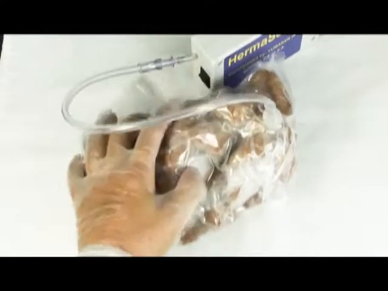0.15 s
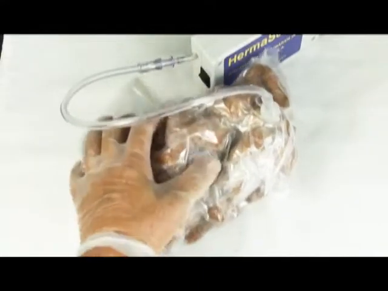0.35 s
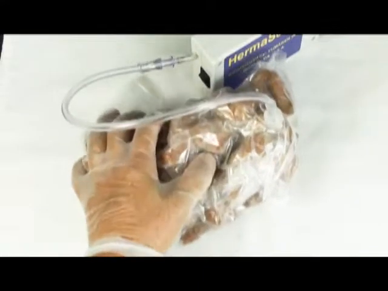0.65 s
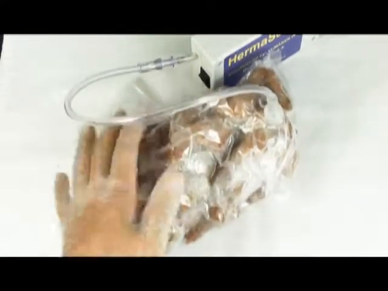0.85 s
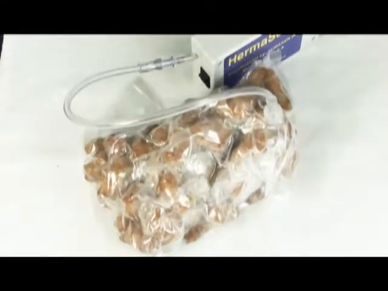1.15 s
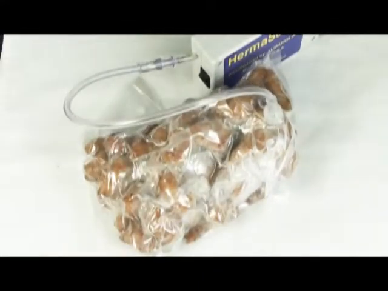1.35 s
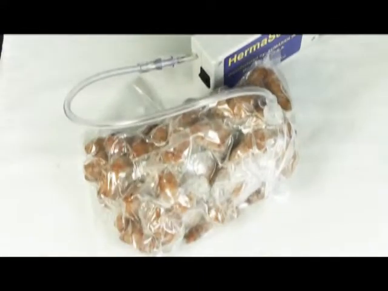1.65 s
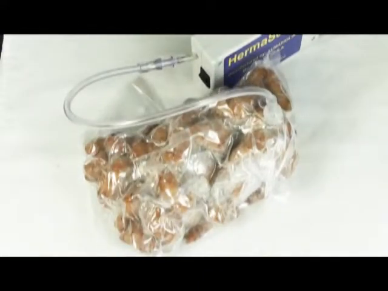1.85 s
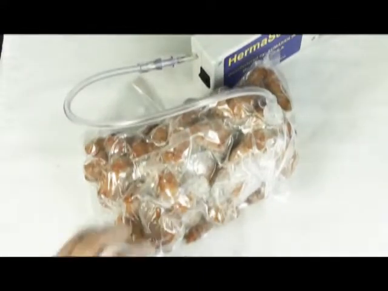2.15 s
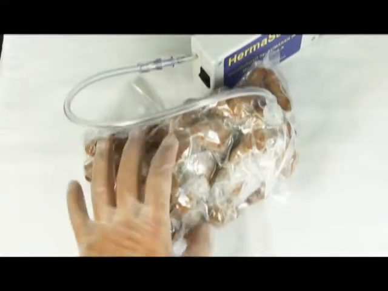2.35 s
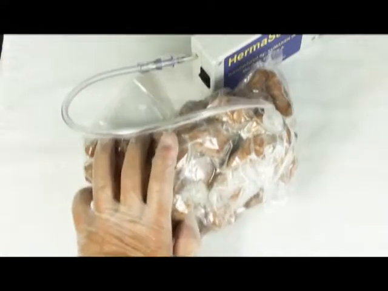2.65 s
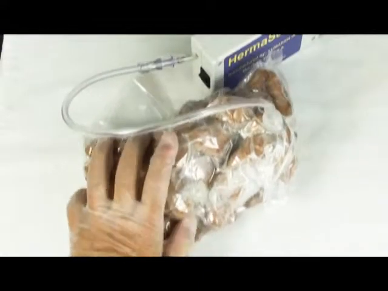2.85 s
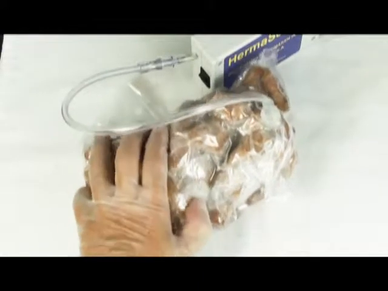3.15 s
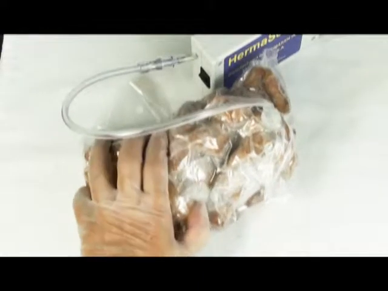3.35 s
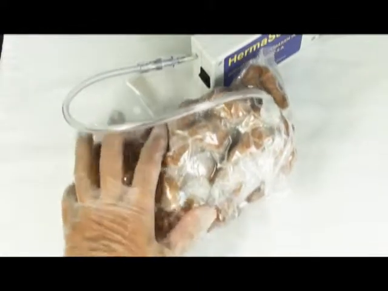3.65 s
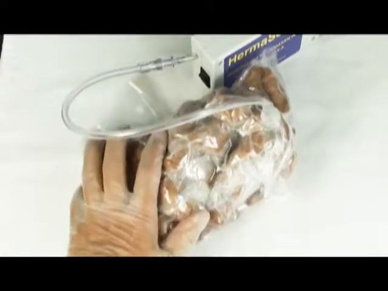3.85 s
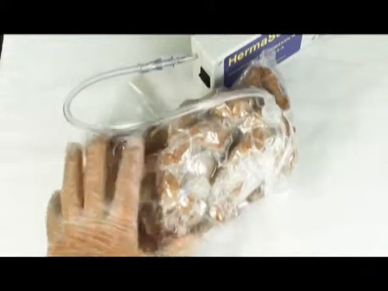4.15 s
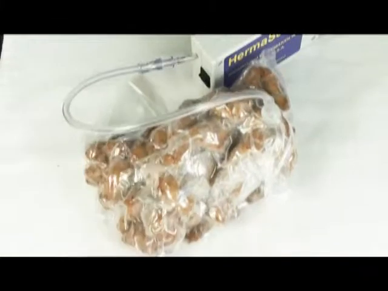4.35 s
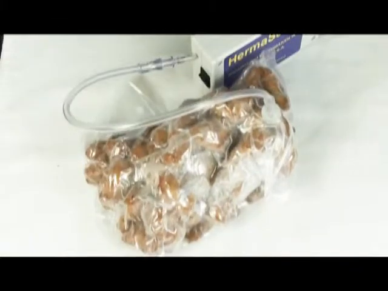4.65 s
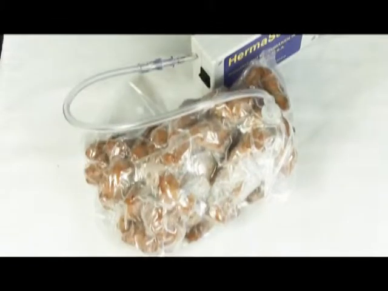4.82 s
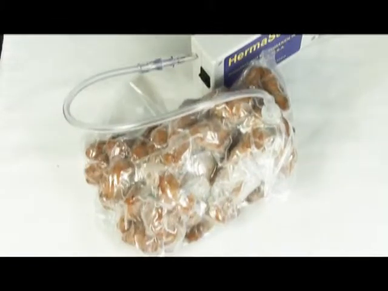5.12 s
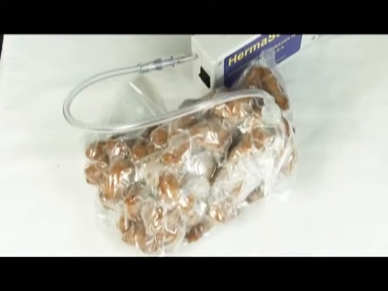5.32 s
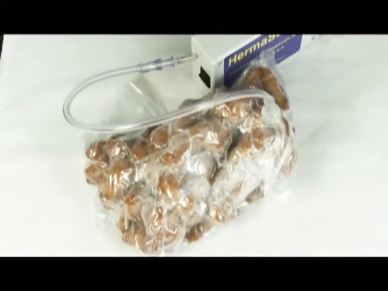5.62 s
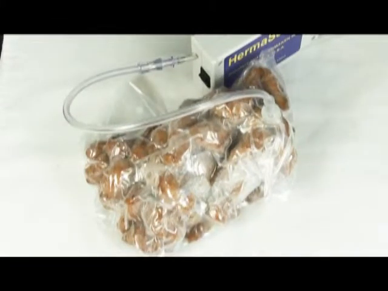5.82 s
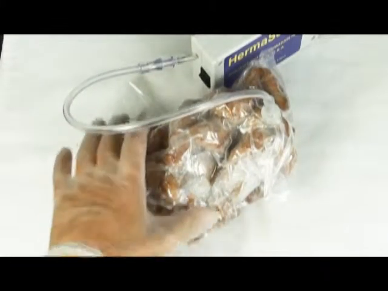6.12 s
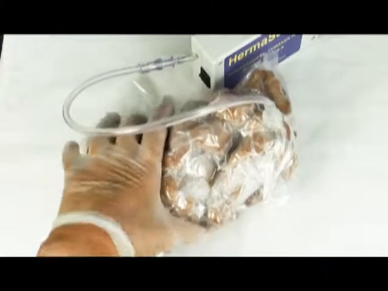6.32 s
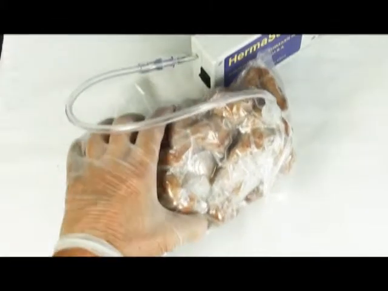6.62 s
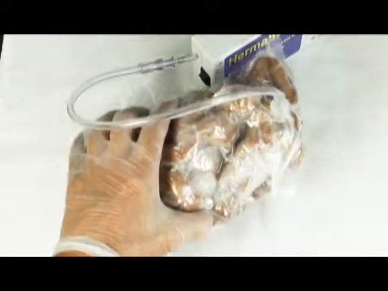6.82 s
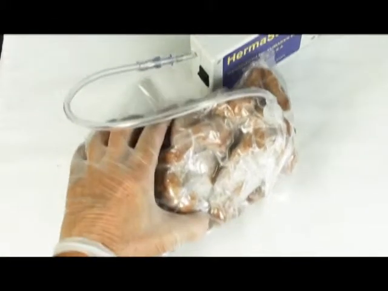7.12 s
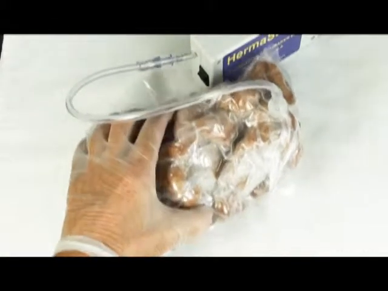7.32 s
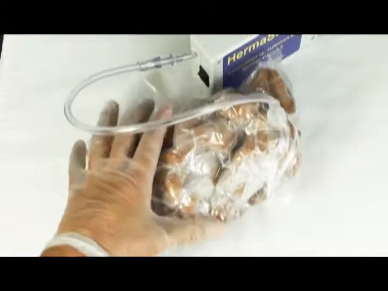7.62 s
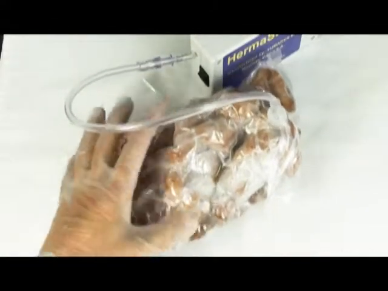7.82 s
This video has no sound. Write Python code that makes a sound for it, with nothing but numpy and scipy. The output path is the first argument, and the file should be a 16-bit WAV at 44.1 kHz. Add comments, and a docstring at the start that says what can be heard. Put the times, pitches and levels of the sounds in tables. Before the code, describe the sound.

A small electric vacuum pump runs throughout with a fast, rattling buzz and a thin hiss of air, slowing very slightly as it empties a plastic bag. A hand works the bag, making light rustles and small sharp crackles that pause midway. Near the end the bag of food bumps the table twice, the second time much louder, with a short crunch. Heard close, indoors, with little echo.

```python
"""Vacuum-packing food on a table

Indoors, close up, in stereo. Right of centre a small diaphragm pump empties a plastic bag, slowing as
the vacuum deepens. Three blows in each shaft turn ring its housing; air hisses past the valves in puffs.
A gloved hand works the bag, which rustles and snaps, and twice bumps it down, with a few light nudges.
A faint room tail sits behind the direct sound."""
import sys
import numpy as np
from scipy import signal
from scipy.fft import rfft, irfft, next_fast_len
from scipy.io import wavfile
from scipy.ndimage import map_coordinates

SR = 44100
rng = np.random.default_rng(int(sys.argv[2]) if len(sys.argv) > 2 else 0)


def waveform_to_disk(signal):
    """Save audio, clipped to [-1, 1], as 16-bit WAV at the path in sys.argv[1]."""
    frames = np.transpose(np.atleast_2d(signal))
    scaled = np.clip(frames, -1, 1) * 32767
    samples = np.round(scaled).astype(np.int16)
    wavfile.write(sys.argv[1], SR, samples)


N = 351918
TIME = np.arange(N) / SR
TOP_HZ = 15750

# the slowing shaft: (time [s], speed [turns/s])
SHAFT_SPEED = [(0.0, 46.373), (0.3, 46.421), (0.6, 46.363), (0.9, 46.243), (1.2, 46.106), (1.5, 46.002),
               (1.8, 45.903), (2.1, 45.822), (2.4, 45.679), (2.7, 45.718), (3.0, 45.584), (3.3, 45.556),
               (3.6, 45.442), (3.9, 45.313), (4.2, 45.185), (4.5, 45.082), (4.8, 45.028), (5.1, 44.891),
               (5.4, 44.775), (5.7, 44.762), (6.0, 44.688), (6.3, 44.596), (6.6, 44.623), (6.9, 44.443),
               (7.2, 44.372), (7.5, 44.418), (7.98, 43.973)]
# where in the turn each blow falls: (time [s], inlet valve [turns], outlet valve [turns], diaphragm [turns])
BLOW_PHASES = [(0.19, 0.4796, 0.8412, 1.0611), (0.71, 0.4851, 0.8397, 1.0588),
               (1.25, 0.4918, 0.8345, 1.0537), (1.8, 0.4957, 0.8317, 1.0517), (2.34, 0.501, 0.8325, 1.053),
               (2.89, 0.5024, 0.8336, 1.0543), (3.44, 0.5051, 0.83, 1.0507), (3.99, 0.512, 0.8278, 1.045),
               (4.54, 0.5169, 0.8248, 1.0398), (5.1, 0.521, 0.8225, 1.038), (5.66, 0.5249, 0.8218, 1.0373),
               (6.21, 0.5278, 0.8222, 1.0361), (6.66, 0.5296, 0.8224, 1.0371),
               (7.16, 0.5351, 0.8233, 1.0357), (7.79, 0.5392, 0.8309, 1.0471)]
# load on the pump: (time [s], vacuum [0-1], inlet blow [dB], outlet blow [dB], diaphragm blow [dB])
PUMP_LOAD = [(0, 0.09, 0.5, -3.5, -2), (.7, 0.19, -1.5, -1.5, 0), (1.4, 0.2, 1.1, -0.5, .5),
             (2.1, 0.3, -0.1, 0, .5), (2.8, 0.26, 1, -0.2, -0.3), (3.5, 0.43, 1.1, 1.2, 0.5),
             (4.2, 0.49, 2.5, -0.4, 0.9), (4.9, 0.5, 1.4, 0.1, 1.2), (5.6, 0.74, .5, 0, 1.2),
             (6.3, 0.76, -0.1, -0.4, 0.6), (7, 0.76, 0.5, 1.46, -0.2), (7.98, 0.78, 0.5, 0.7, -1.2)]
# how the pump runs: (time [s], body gain [dB], base scatter of blows [ms], hose gain [dB], hiss gain [dB])
PUMP_RUNNING = [(0.0, -58, 0.055, -54, -59.5), (0.29, -58.5, 0.03, -58, -60.5),
                (1.84, -60, 0.039, -56.5, -62), (2.04, -59, 0.042, -61, -62.5),
                (2.46, -58.5, 0.033, -57.5, -61), (2.82, -59, 0.041, -60, -63),
                (3.2, -60, 0.041, -57.5, -62), (3.49, -61, 0.048, -58.5, -63),
                (3.71, -59, 0.031, -61, -61.5), (4.8, -59.5, 0.046, -59.5, -63),
                (5.02, -60, 0.021, -58, -62.5), (5.42, -59, 0.028, -58, -62), (6.0, -57.5, 0.015, -63, -62),
                (6.49, -58.5, 0.018, -63, -60.5), (6.89, -59.5, 0.018, -61.5, -62),
                (7.42, -59.5, 0.015, -59.5, -61.5), (7.64, -60, 0.015, -52.5, -60),
                (7.89, -59, 0.016, -62, -62.5), (7.98, -60.5, 0.045, -52, -65)]
# housing modes: (frequency [Hz], t60 [s], lag [ms], inlet, outlet, diaphragm [signed strength]);
# each of the three blows has two columns, at no and at full vacuum
HOUSING_MODES = [(199, 0.094, 2.26, 2.2, 2.5, 7.6, 7.7, -7.8, -9.0),
                 (300, 0.15, 1.12, -3.9, 3.8, 3.7, 2.4, -1.7, 3.8),
                 (398, 0.063, 0.61, 0.1, 4.5, 11.2, 9.5, -7.5, -3.8),
                 (509, 0.073, 0.0, -2.0, -3.8, 0.4, 9.6, -0.6, 6.9),
                 (624, 0.15, 1.8, 2.3, -3.3, -1.7, 7.6, 2.4, -3.3),
                 (733, 0.028, 2.41, -0.2, -10.7, 25.8, -4.6, 2.3, -2.6),
                 (837, 0.15, 2.13, 1.3, -11.1, 10.1, -1.2, -5.7, -2.2),
                 (946, 0.038, 2.26, 16.4, 32.9, -2.6, -14.3, -12.0, -5.7),
                 (1057, 0.053, 1.69, 4.5, -2.5, -8.7, 14.6, 13.8, -6.8),
                 (1228, 0.144, 3.06, 3.1, -6.5, 5.2, 3.2, -10.8, 5.1),
                 (1260, 0.049, 2.42, 1.1, 27.0, -8.0, -6.0, 11.8, -3.4),
                 (1263, 0.012, 0.19, -8.6, -19.5, -11.7, -22.3, 4.3, 4.1),
                 (1481, 0.039, 2.52, 3.5, 8.9, -15.2, -16.2, -6.9, -10.2),
                 (1507, 0.083, 0.31, 4.0, 7.6, -1.5, 4.4, -2.7, -5.9),
                 (1686, 0.046, 2.23, -0.8, 3.3, 0.9, -6.8, 1.2, -1.1)]
# modes of the metal pump head, same columns
HEAD_MODES = [(1922, 0.032, 0.618, 0.86, 6.8, 3, 5.1, 0.81, 3.5),
              (2017, 0.036, 1.073, 1.1, 0.85, 5.6, 3.9, 0.4, 2.7),
              (2191, 0.056, 0.69, 1.7, 0.86, 2, 2.3, 0.61, 1.7),
              (2792, 0.035, 0.34, 0.067, 5.2, 3.4, 7, 0.35, 0.15),
              (2940, 0.012, 0.37, 0.059, 8.5, 1.1, 7.7, .3, .3),
              (3207, 0.032, 0.42, 0.047, 1.27, 2.64, 2.6, 0.37, 0.17),
              (3927, 0.021, 0.438, 0.075, 1.45, 0.36, 4.2, .2, 0.22),
              (4195, 0.045, 0.374, .1, 2.14, 1.06, 0.98, 0.19, 0.26),
              (5350, 0.014, 0.544, .1, 0.3, 1.5, 0.18, .4, .1),
              (6100, .025, 1.28, .1, 0.85, 1.8, 0.69, 0.53, 0.92),
              (7760, .02, 1.3, .1, 0.63, .7, .7, .3, 0.33)]
# the whole pump rocks with the shaft: (harmonic [number], relative level [dB])
ROCKING = [(1, -84), (2, -76), (3, -67)]
# air leaving the valves: (phase [turns], width [turns], whistle boost [dB], hiss boost [dB])
AIR_PUFFS = [(0.613, 0.071, 8, 2), (0.064, 0.089, 7, 5), (0.924, 0.036, 3, 7.5)]
# turbulence in the hose: (frequency [Hz], relative level [dB])
HOSE_SPECTRUM = [(30, -36), (45, -27), (70, -32), (110, -23.5), (150, -5.5), (220, -15), (300, -11),
                 (420, -12.5), (800, -5.5), (1500, -8), (2500, -16.5), (4000, -25.5), (6000, -56)]
# hiss at the valves: (frequency [Hz], relative level [dB])
HISS_SPECTRUM = [(1800, -9), (3000, -3.5), (4000, -4.5), (4900, -7), (5500, -7.5), (6140, -3.5), (6810, -8),
                 (7900, -6), (9000, -10.5), (10300, -13.5), (12000, -10.5), (13200, -15), (14100, -14),
                 (14700, -20), (15700, -17)]
# flickering whistle band of the air: (frequency [Hz], relative level [dB])
WHISTLE_SPECTRUM = [(9000, -40), (11200, -15), (12000, 4), (12600, -5), (13300, -9), (14100, 1),
                    (14700, -18), (15700, -40)]
# the hand drags over the film: (time [s], half length [s], level [dB])
HAND_DRAGS = [(.01, 0.019, -54), (0.15, 0.048, -61), (.24, .03, -64), (.38, 0.03, -57), (.82, 0.043, -60),
              (1.03, 0.055, -75), (1.63, 0.023, -61), (1.822, .06, -77), (2.118, 0.025, -65),
              (2.24, .03, -65), (2.506, 0.057, -64), (2.776, 0.035, -60), (3.05, 0.069, -61),
              (3.24, .03, -59), (3.653, .06, -59), (4.17, .06, -63), (6.332, .025, -56), (6.468, .04, -65),
              (6.616, 0.036, -57), (7.04, 0.026, -52), (7.543, 0.028, -48), (7.655, 0.041, -58),
              (7.96, .03, -56)]
# rustling plastic film: (frequency [Hz], relative level [dB])
FILM_SPECTRUM = [(800, -31), (2000, -19), (4000, -4), (6000, -2.5), (9000, -5), (13000, -10), (16000, -24)]
# creases that snap: (time [s], relative level [dB], centre [Hz], width [octaves])
CREASE_SNAPS = [(0.0931, -54, 5990, 0.4), (0.113, -38, 6070, 0.34), (0.1729, -35, 4250, 0.56),
                (0.2123, -43, 4210, 0.4), (0.237, -40, 5950, 0.4), (0.3635, -48, 6400, 0.4),
                (0.7975, -40, 3520, 0.4), (0.9247, -43, 6190, 0.43), (0.9965, -41, 6280, 0.4),
                (1.058, -44, 6140, 0.35), (1.6047, -35, 6140, 0.28), (1.7948, -42, 6130, 0.4),
                (1.889, -37.5, 6800, 0.4), (2.235, -36.5, 6100, 0.24), (2.7474, -33, 3580, 0.4),
                (2.783, -39, 6100, 0.4), (3.031, -43, 5920, 0.43), (3.0613, -41, 4300, 0.4),
                (3.239, -41, 3420, 0.4), (3.6809, -42, 4310, 0.4), (3.7428, -45, 4150, 0.4),
                (6.322, -52, 4200, 0.4), (6.6107, -27, 4850, 0.48), (6.718, -42, 3880, 0.4),
                (7.0353, -31, 4060, 0.62), (7.503, -38, 3840, 0.4), (7.5162, -42, 4940, 0.4),
                (7.5287, -30.5, 3530, 0.34), (7.5715, -40, 3790, 0.58), (7.744, -38, 3400, 0.45),
                (7.9363, -49, 5910, 0.4)]
# the bag meets the table: (time [s], thud gain [dB], contact [ms], crunch level [dB], crunch t60 [s])
BAG_BUMPS = [(0.149, -45, 8, -62, 0.17), (3.131, -46, 9.8, -64, .2), (3.83, -49, 10, -60, .2),
             (7.016, -16, 12.4, -42, 0.35), (7.048, -41, 8.7, -46, 0.31), (7.5323, -4, 6.2, -24.5, 0.29),
             (7.562, -16.5, 5.8, -31, 0.22), (7.592, -19, 5, -55, 0.66), (7.96, -45, 6, -49, .2)]
# modes of the table: (frequency [Hz], relative level [dB], t60 [s])
TABLE_MODES = [(43, -28.5, 0.95), (91, -10, 0.2), (114, 2, 0.055), (151.5, -19, .2), (230, -27, 0.053),
               (312, -23.5, 0.22), (529.6, -12, 0.26), (880, -10, .1)]
# shifting food: (frequency [Hz], relative level [dB])
CRUNCH_SPECTRUM = [(100, -6), (250, -4), (550, -3), (1000, -5), (2200, -13.5), (5000, -32.5), (15000, -36)]
# the pump's balance at the microphone: (frequency [Hz], left over right [dB])
MIC_BALANCE = [(60, 7.5), (110, -3.5), (200, 2), (380, -1.0), (700, -3), (1290, -2.5), (2380, 0.5),
               (4400, 1), (8120, -2), (15000, 0.0)]
# the pump's phase at the microphone: (frequency [Hz], left lead [rad])
MIC_PHASE = [(0, -0.96), (1030, -0.14), (1290, 0.2), (2240, 0.4), (3190, 0.1), (3450, 0.4), (3880, 0.0),
             (4130, 0.36), (5080, 0.0), (8010, 0.1), (8530, -0.1), (8790, 0.1), (9220, -0.0), (15300, 0.0)]
# how alike the noises are in left and right; the highest band is the same in both: (frequency [Hz], likeness
# [0-1])
STEREO_LIKENESS = [(60, 1), (300, 1), (1000, 0.73), (3000, 0.69), (6000, 0.74), (10000, 0.78), (12000, 1)]
# decay of the room: (frequency [Hz], t60 [s])
ROOM_DECAY = [(150, 0.31), (1000, 0.9), (8000, 0.067)]


def amp(db):
    return 10 ** (np.asarray(db) / 20)


def unit_rms(x):
    return x / np.sqrt(np.mean(x ** 2) + 1e-20)


def along(points, hz):
    """Interpolate (frequency [Hz], value) points on a log axis."""
    f, v = np.transpose(points)
    return np.interp(np.log(hz + 1), np.log(f + 1), v)


def curves(rows):
    """One value per sample for each column after the time."""
    times, *columns = np.transpose(rows)
    return [np.interp(TIME, times, column) for column in columns]


def wobble(rate):
    """A smooth random curve, rate knots a second."""
    return map_coordinates(rng.standard_normal(4096), [TIME * rate], mode="wrap")


def filtered(x, response):
    """Filter x by a complex response of frequency."""
    size = next_fast_len(N + SR // 2)
    return irfft(rfft(x, size) * response(np.fft.rfftfreq(size, 1 / SR)), size)[..., :N]


def stereo_noise(spectrum, envelope=1):
    """Coloured noise of rms 1, partly alike in the two channels."""
    def colour(hz):
        spread = np.arccos(np.clip(along(STEREO_LIKENESS, hz), -1, 1)) / 2
        return amp(along(spectrum, hz)) * [np.cos(spread), np.sin(spread)]
    mid, side = filtered(rng.standard_normal((2, N)) * envelope, colour)
    return unit_rms(np.array([mid + side, mid - side]))


def pulses(seconds, sizes):
    """Impulses placed between samples by a windowed sinc."""
    at = seconds[:, None] * SR
    i = np.floor(at).astype(int) + np.arange(-7, 9)
    taps = np.sinc(i - at) * np.cos(np.pi * (i - at) / 16) ** 2 * sizes[:, None]
    return np.bincount(np.clip(i, 0, N).ravel(), taps.ravel(), N + 1)[:N]


def pump(turns):
    """Each blow lands once a turn, a little early or late; the vacuum shifts how it drives the modes."""
    body_db, scatter_ms = curves(PUMP_RUNNING)[:2]
    vacuum, *blows_db = curves(PUMP_LOAD)
    looseness = [1.3, .5, .7]  # inlet, outlet, diaphragm
    trains = []
    for phase, blow_db, loose in zip(curves(BLOW_PHASES), blows_db, looseness):
        when = np.interp(np.arange(int(turns[-1])), turns - phase, TIME)
        spread_ms = loose * np.interp(when, TIME, scatter_ms)
        late_ms, uneven = rng.standard_normal((len(when), 2)).T * spread_ms
        sizes = amp(np.interp(when, TIME, blow_db) + 4 * uneven)  # a loose valve also varies in strength
        train = pulses(when + late_ms / 1000, sizes)
        trains += [train * (1 - vacuum), train * vacuum]
    rings = pump_ringing(HOUSING_MODES, rise_ms=0.039) + pump_ringing(HEAD_MODES, rise_ms=0.34)
    body = signal.fftconvolve(trains, rings, axes=1).sum(0)[:N]
    body = filtered(body, lambda hz: 1 / (1 + (165 / (hz + 1)) ** 8))  # a small box radiates no bass
    rocking = np.zeros(N)
    for harmonic, db in ROCKING:
        rms = amp(db + 3.5 - 8.1 * vacuum + 0.87 * wobble(2.99))
        rocking += rms * np.sqrt(2) * np.sin(2 * np.pi * harmonic * turns)
    return amp(body_db) * body + rocking


def pump_ringing(modes, rise_ms):
    """Response to each blow at no and at full vacuum: damped sines that start after their lags."""
    hz, t60, lag_ms, *strengths = np.transpose(modes)
    t = np.clip(TIME[:SR // 4, None] - lag_ms / 1000, 0, None)
    envelope = amp(-60 * t / t60) * (1 - np.exp(-t * 1000 / rise_ms))
    return np.array(strengths) @ (envelope * np.sin(2 * np.pi * hz * t)).T


def pumped_air(turns):
    """Turbulence in the hose, hiss at the valves and a high whistle, in puffs tied to the shaft."""
    hose_db, hiss_db = curves(PUMP_RUNNING)[2:]
    boosts_db = np.zeros((2, N))
    for phase, width, *peaks_db in AIR_PUFFS:
        offset = (turns - phase + .5) % 1 - .5
        boosts_db += np.outer(peaks_db, np.exp(-(offset / width) ** 2))
    whistle_puff_db, hiss_puff_db = boosts_db
    hose = amp(hose_db + 8.5 + 0.35 * whistle_puff_db + 1.4 * wobble(5.1)) * stereo_noise(HOSE_SPECTRUM)
    hiss_gain = amp(hiss_db + 4.5 + 1.13 * wobble(19))
    hiss = unit_rms(amp(hiss_puff_db) * stereo_noise(HISS_SPECTRUM))
    whistle = unit_rms(amp(whistle_puff_db + 1.8 * wobble(30)) * stereo_noise(WHISTLE_SPECTRUM))
    return hose + hiss_gain * hiss + amp(hiss_db - 7.5) * whistle


def bag_rustle():
    """The film crackles in clumped grains under the hand."""
    clumps = amp(4 * wobble(400) + 2 * wobble(40))
    drag = sum(amp(db) * np.exp(-((TIME - when) / half) ** 2) for when, half, db in HAND_DRAGS)
    creep = amp(-76)  # the shrinking film creeps faintly all the time
    return (drag + creep) * stereo_noise(FILM_SPECTRUM, clumps)


def crease_snaps():
    """Single creases snap: bands of noise that die within milliseconds, leaving a weak tail."""
    snaps = np.zeros((2, N))
    t = TIME[:2048]
    hz = np.fft.rfftfreq(len(t), 1 / SR)
    decay = amp(-60 * t / 0.0086) + .12 * amp(-60 * t / 0.094)
    for when, db, centre_hz, octaves in CREASE_SNAPS:
        band = np.exp(-(np.log2(hz / centre_hz + 1e-9) / octaves) ** 2 / 2)
        mid, side = irfft(rfft(rng.standard_normal((2, len(t)))) * band)
        burst = unit_rms(np.array([mid + 0.25 * side, mid - 0.18 * side]))
        at = round(when * SR)
        snaps[:, at:at + len(t)] += (amp(db - 3.5) * decay * burst)[:, :N - at]
    return snaps


def table_bumps():
    """A soft contact rings the low modes of the table while the food in the bag crunches and settles."""
    thud, settling = np.zeros((2, N + SR))
    t = TIME[:SR // 2]
    for when, thud_db, contact_ms, crunch_db, crunch_t60 in BAG_BUMPS:
        ring = np.zeros(len(t))
        for hz, db, t60 in TABLE_MODES:
            reach = 1 / (1 + (0.4 * hz * contact_ms / 1000) ** 2)  # a longer contact reaches fewer modes
            ring += reach * amp(db - 60 * t / t60) * np.sin(2 * np.pi * hz * t)
        at = round(when * SR)
        thud[at:at + len(t)] += amp(thud_db) * ring * (1 - np.exp(-(t * 1000 / contact_ms) ** 2))
        settling[at:at + len(t)] += amp(crunch_db - 60 * t / crunch_t60) * (1 - np.exp(-t / 0.0024))
    lumps = amp(4.1 * wobble(120))
    return thud[:N] + settling[:N] * stereo_noise(CRUNCH_SPECTRUM, lumps)


def room(x):
    """The tail reaches the microphone about 7 ms late; each frequency dies at its own speed."""
    hz, t, noise = signal.stft(rng.standard_normal((2, SR // 2)), SR, nperseg=256)
    decay = amp(-60 * t / along(ROOM_DECAY, hz)[:, None])
    tail = signal.istft(noise * decay, SR, nperseg=256)[1]
    delayed = np.pad(x, (300, 0))[None]
    return signal.fftconvolve(delayed, tail / np.linalg.norm(tail[0]), axes=1)[:, :N]


def scene():
    """The pump stands close, right of centre, so the channels differ a little in level and phase."""
    def placement(hz):
        half = np.array([[.5], [-.5]])  # left, right
        return amp(half * along(MIC_BALANCE, hz)) * np.exp(1j * half * along(MIC_PHASE, hz))
    turns = np.cumsum(curves(SHAFT_SPEED)[0]) / SR
    machine = pump(turns)
    handling = bag_rustle() + crease_snaps() + table_bumps()
    direct = filtered(machine, placement) + pumped_air(turns) + handling
    return direct + amp(-17.5) * room(machine) + amp(-20.5) * room(handling.mean(0))


def record(dry):
    """The camera keeps nothing above its band limit."""
    return filtered(dry, lambda hz: hz < TOP_HZ)


dry = scene()
out = record(dry)
waveform_to_disk(out)
```